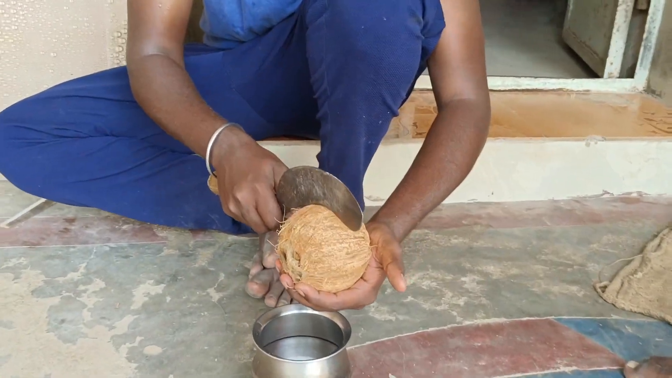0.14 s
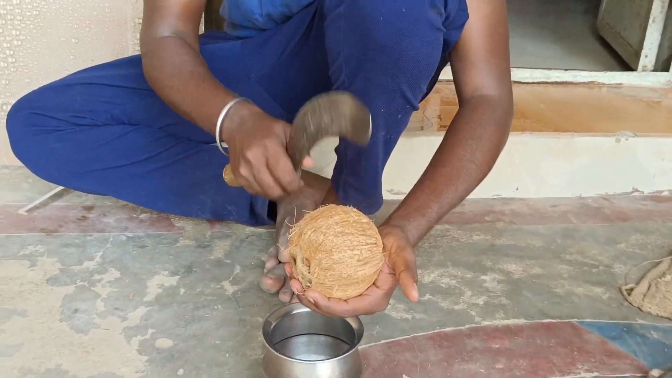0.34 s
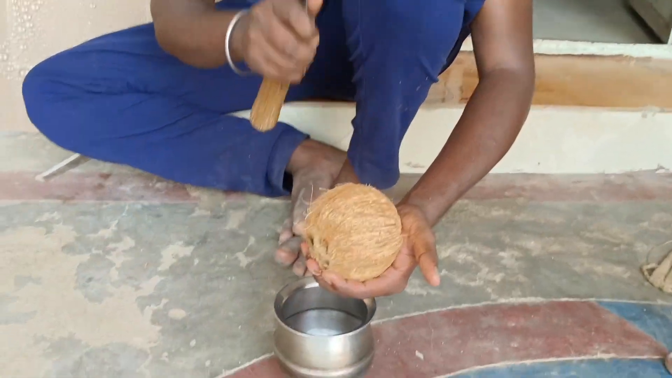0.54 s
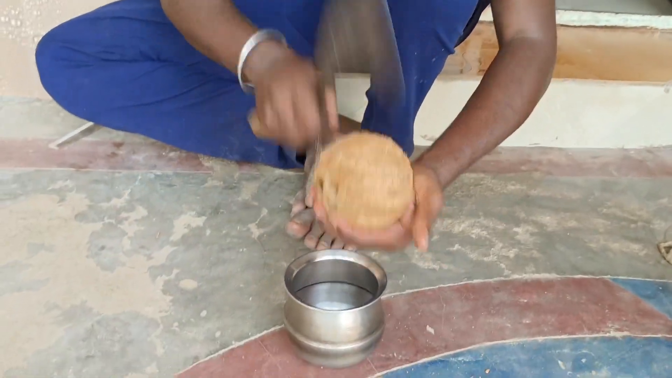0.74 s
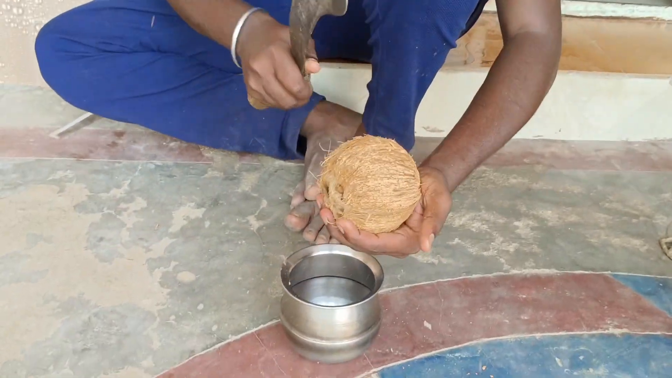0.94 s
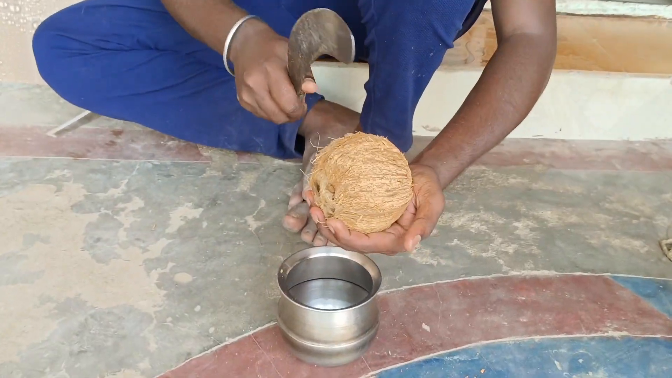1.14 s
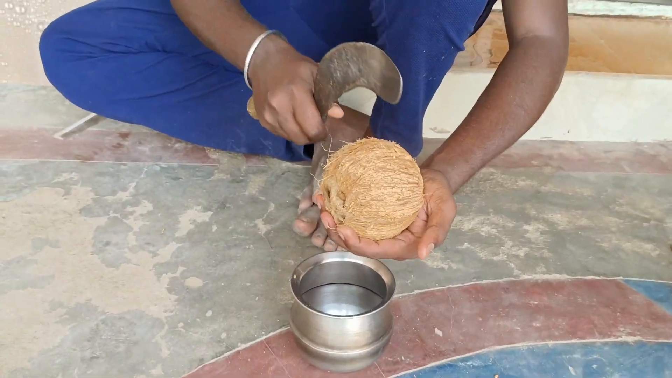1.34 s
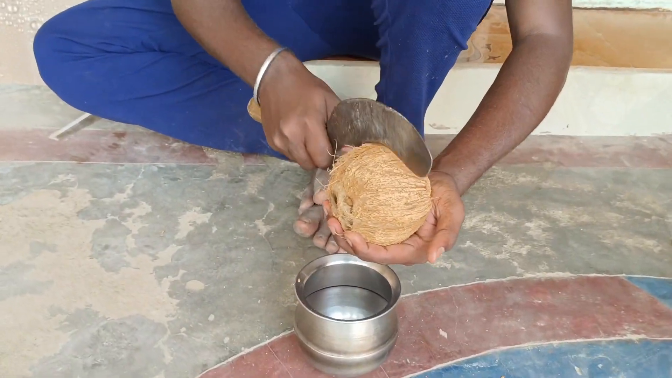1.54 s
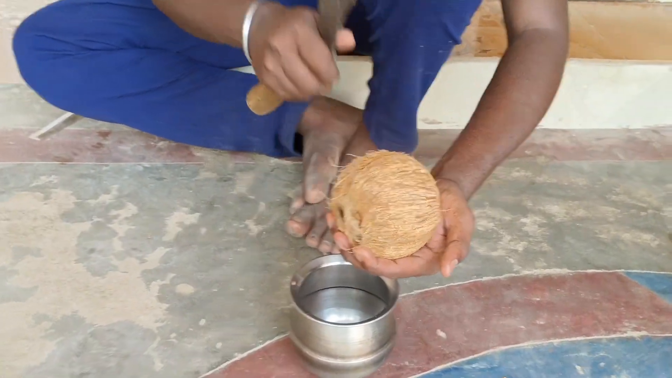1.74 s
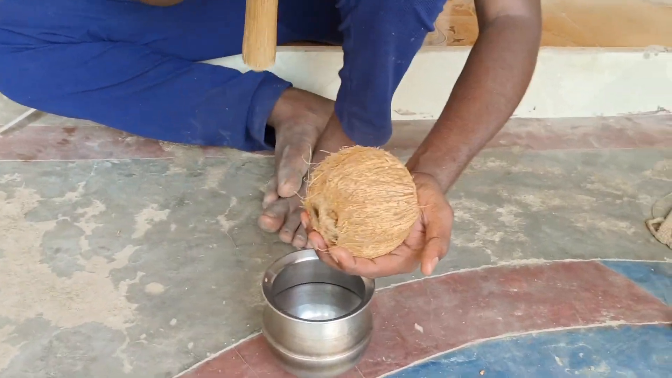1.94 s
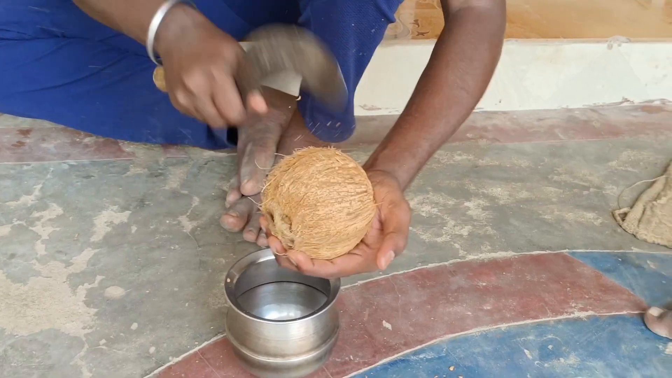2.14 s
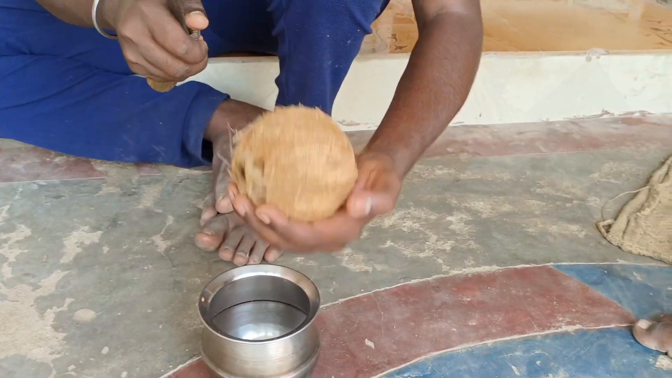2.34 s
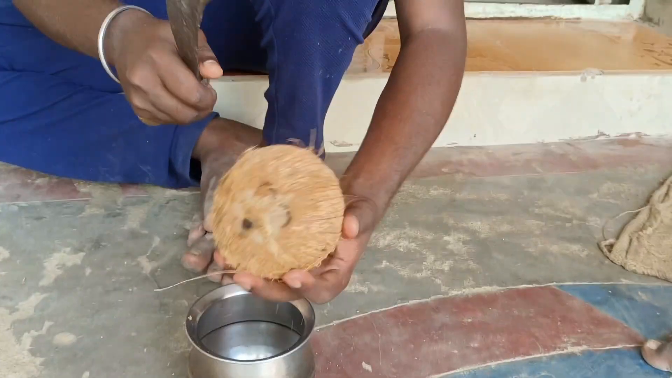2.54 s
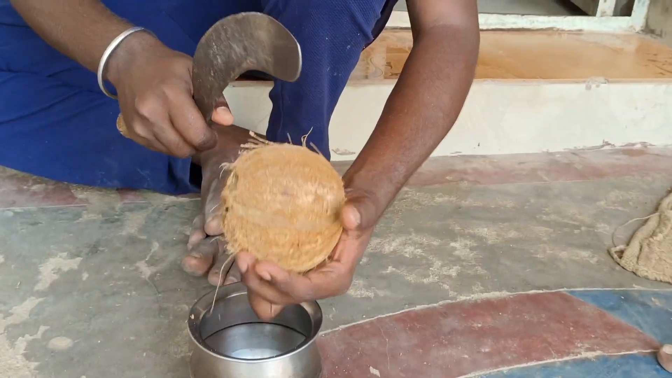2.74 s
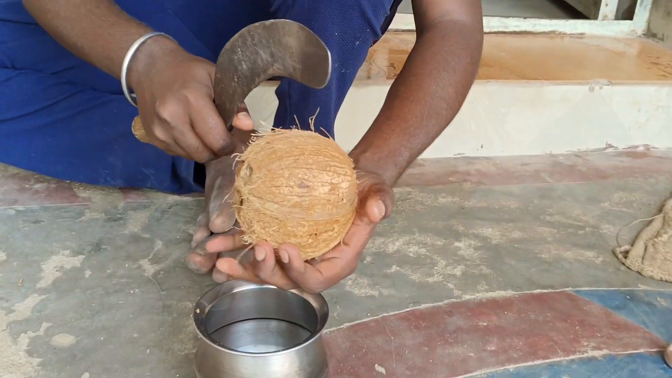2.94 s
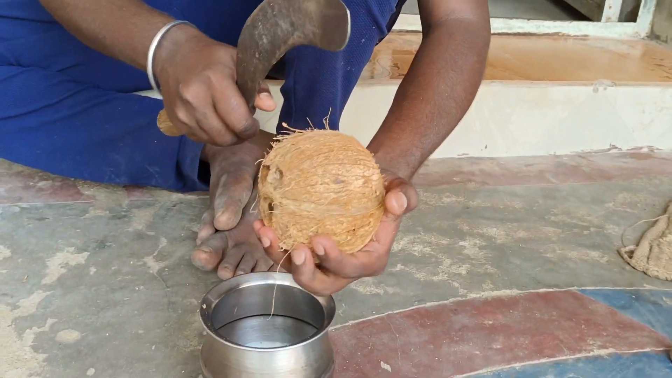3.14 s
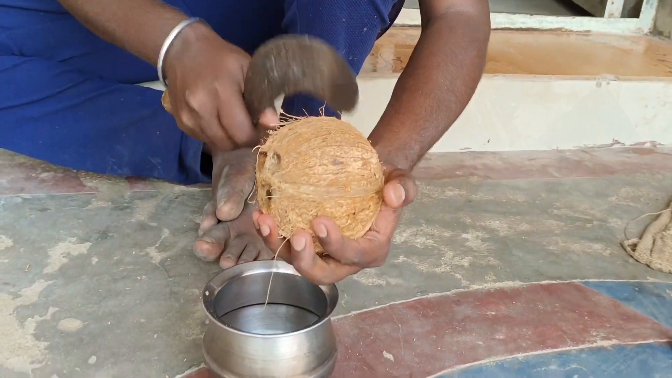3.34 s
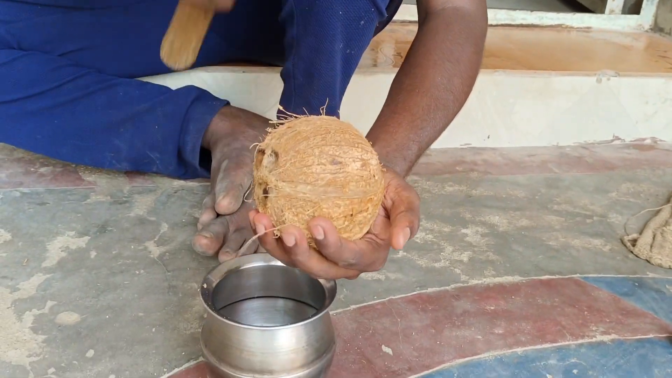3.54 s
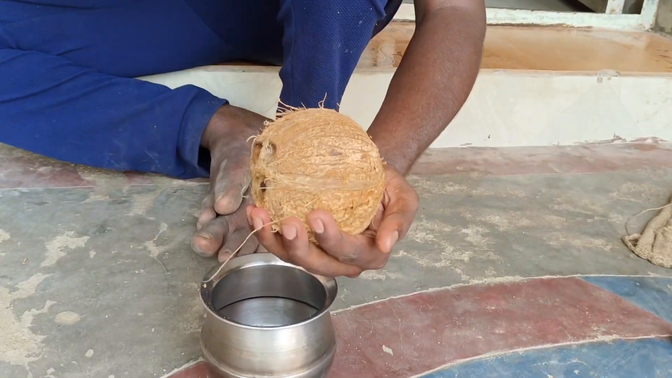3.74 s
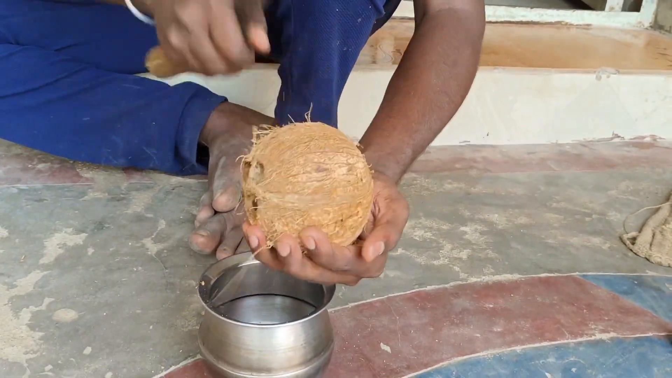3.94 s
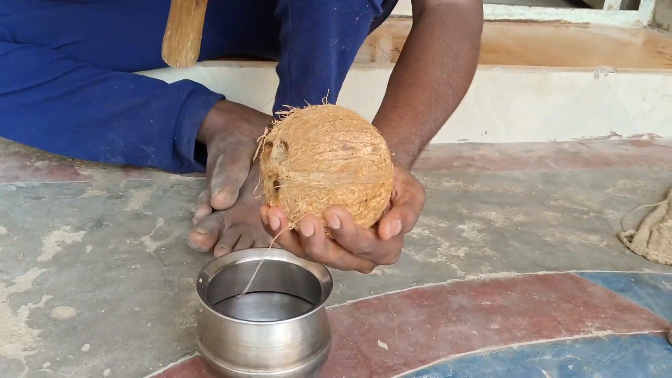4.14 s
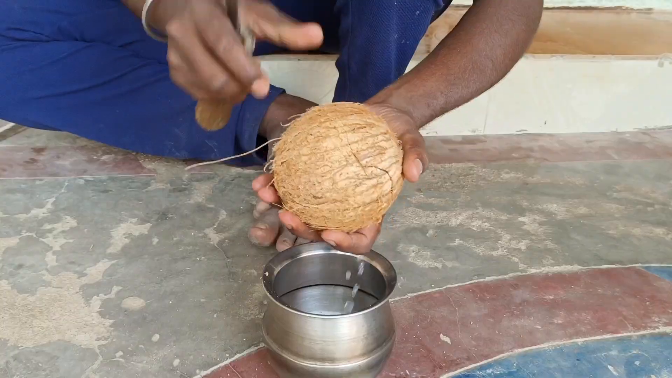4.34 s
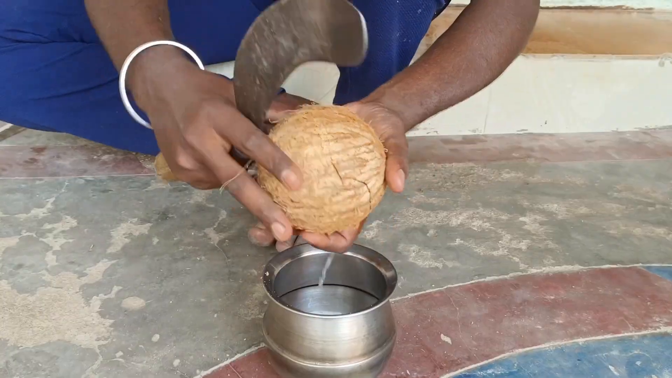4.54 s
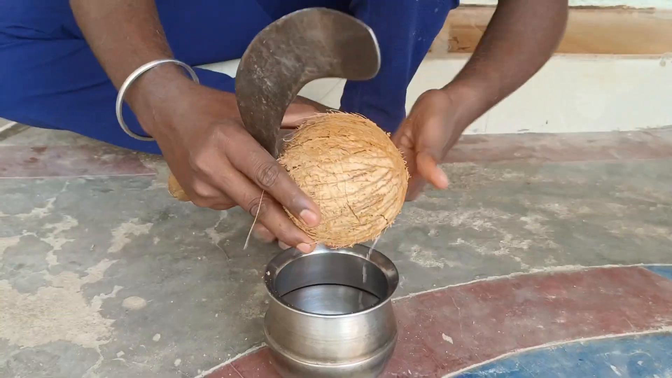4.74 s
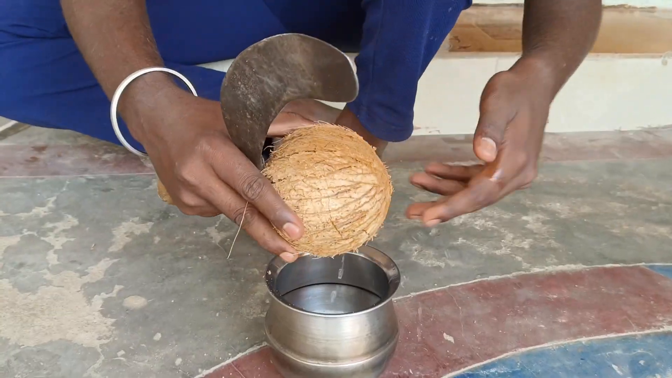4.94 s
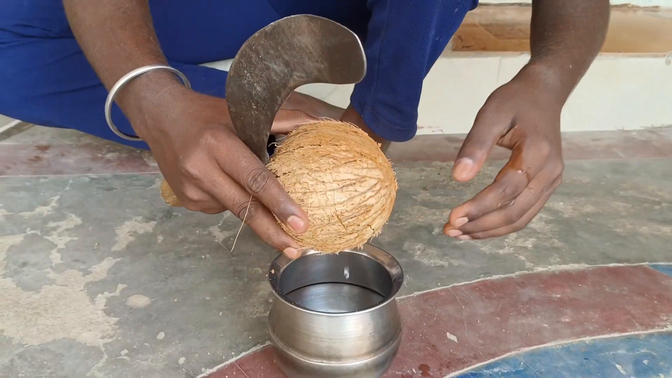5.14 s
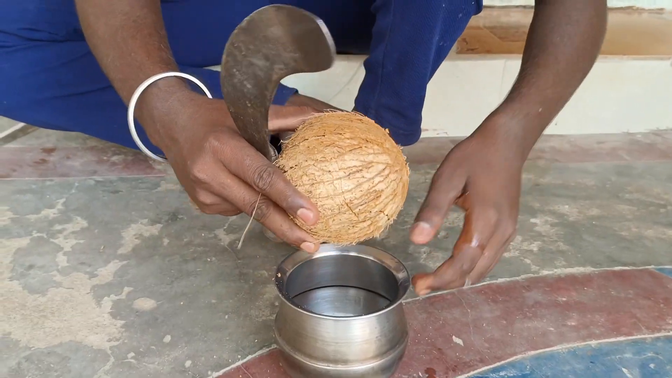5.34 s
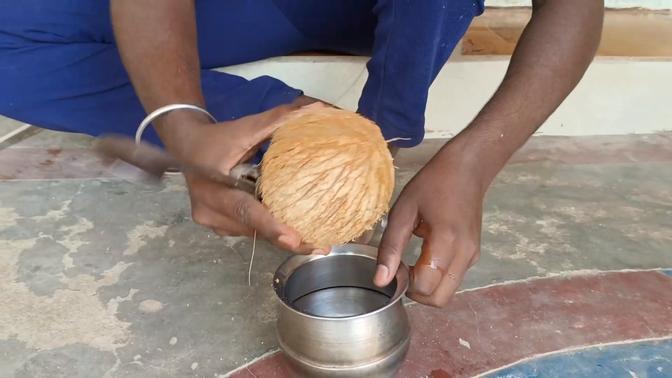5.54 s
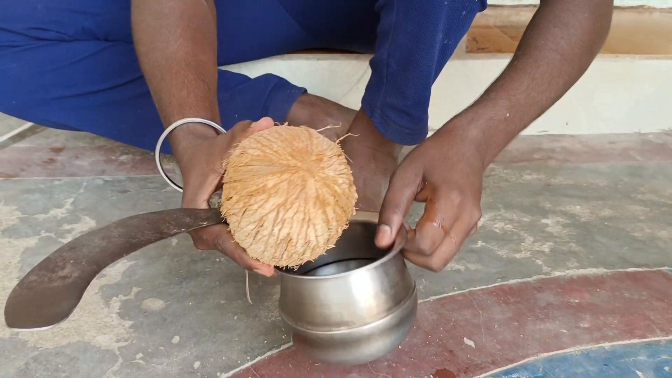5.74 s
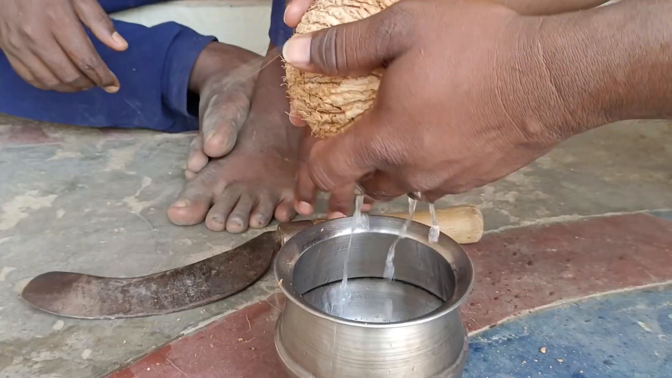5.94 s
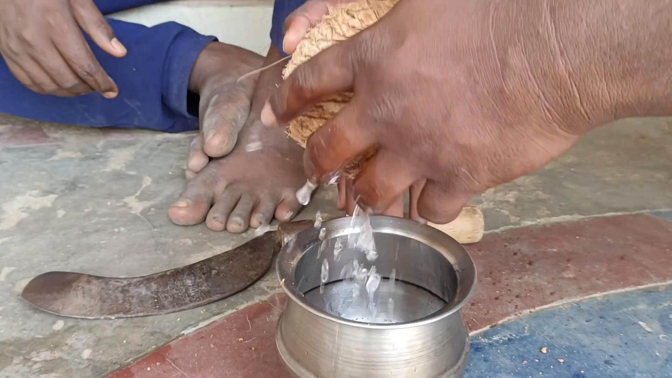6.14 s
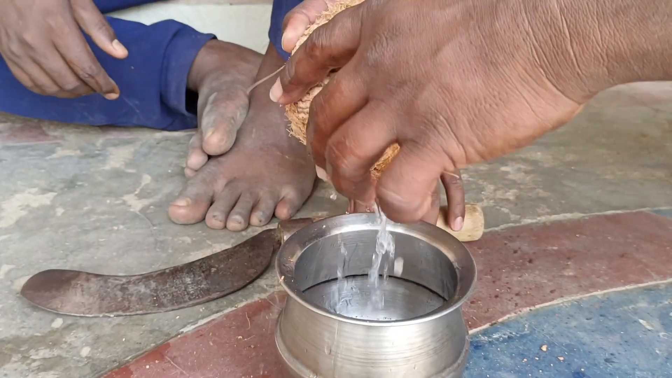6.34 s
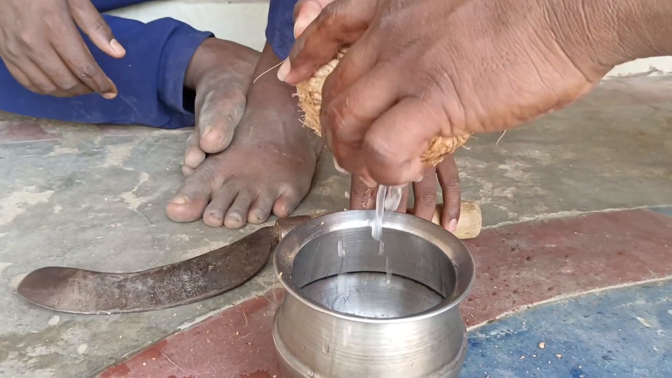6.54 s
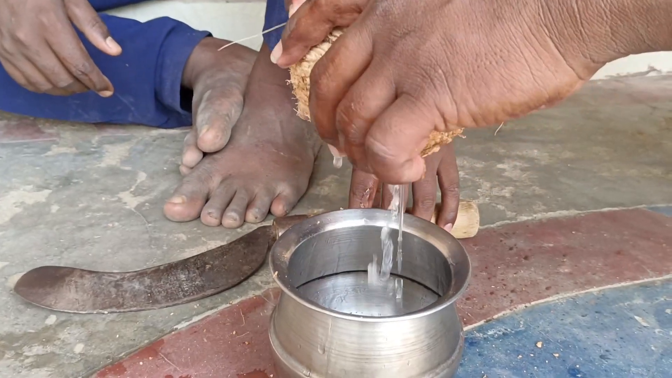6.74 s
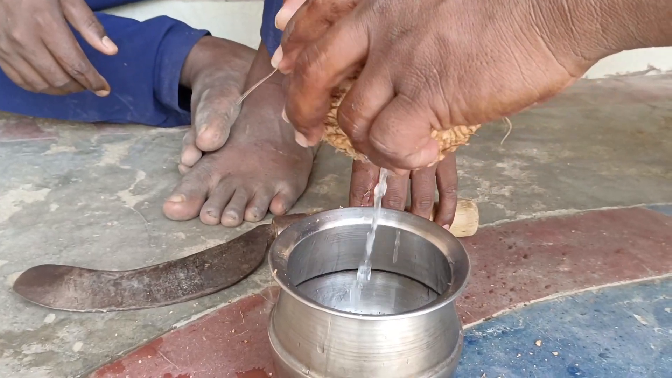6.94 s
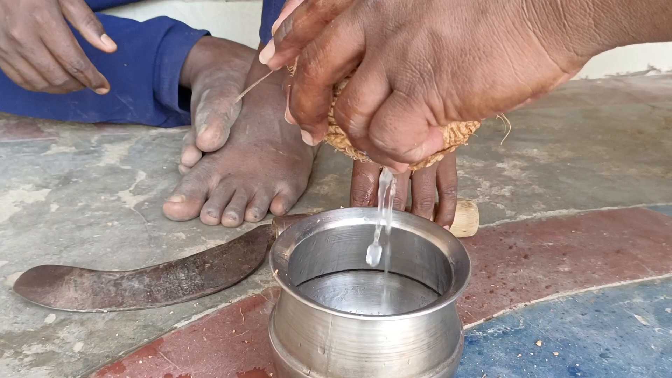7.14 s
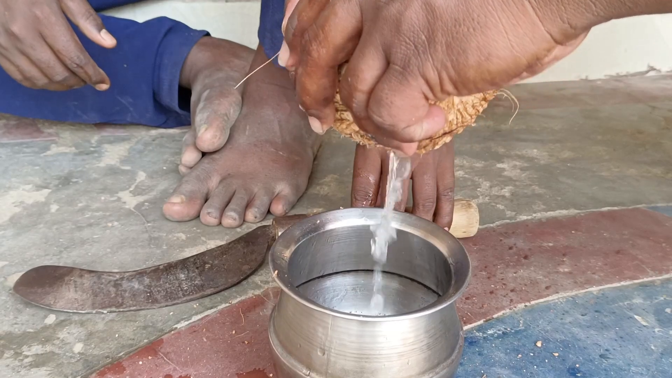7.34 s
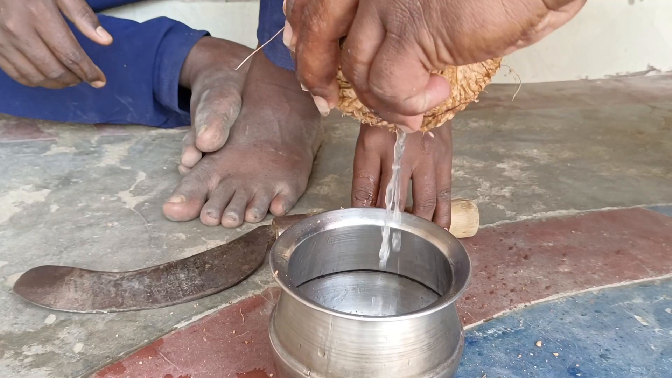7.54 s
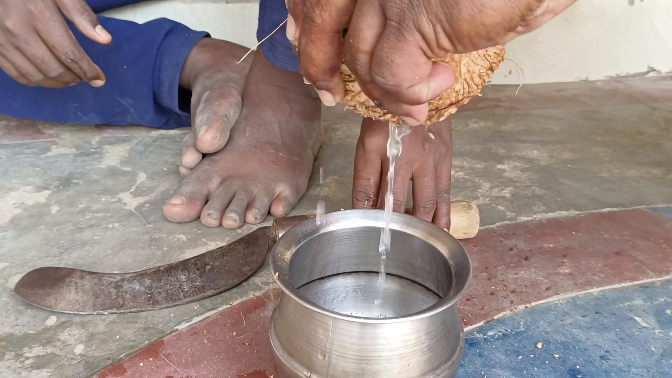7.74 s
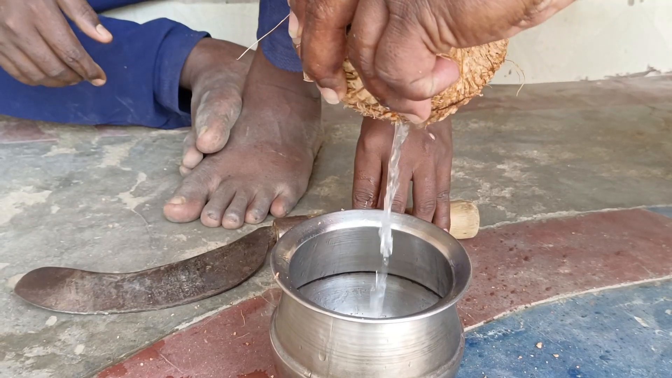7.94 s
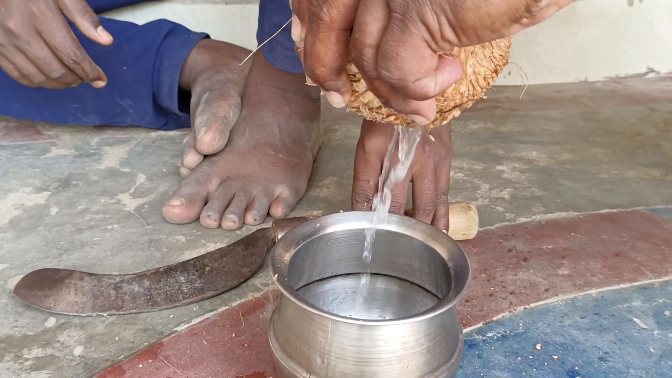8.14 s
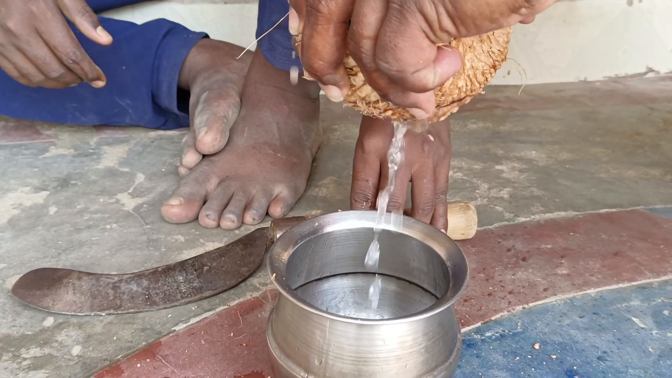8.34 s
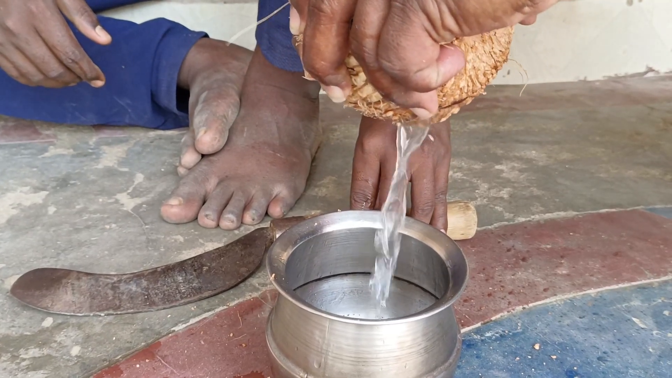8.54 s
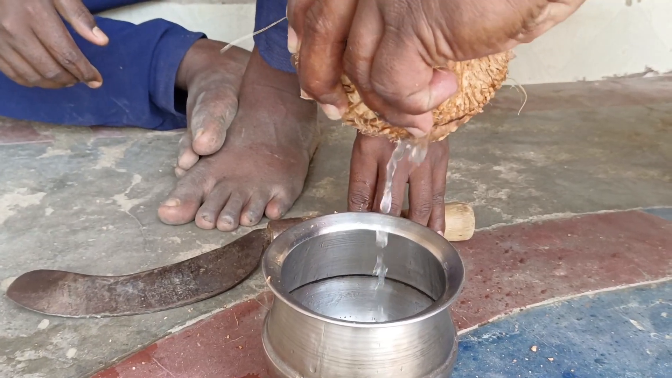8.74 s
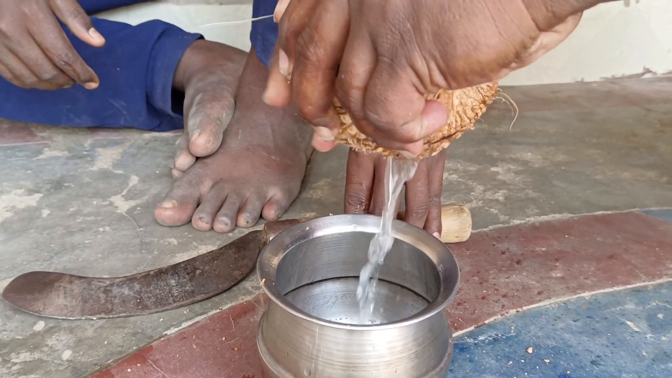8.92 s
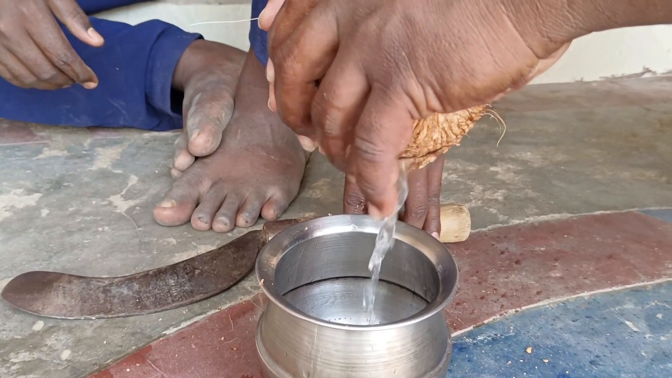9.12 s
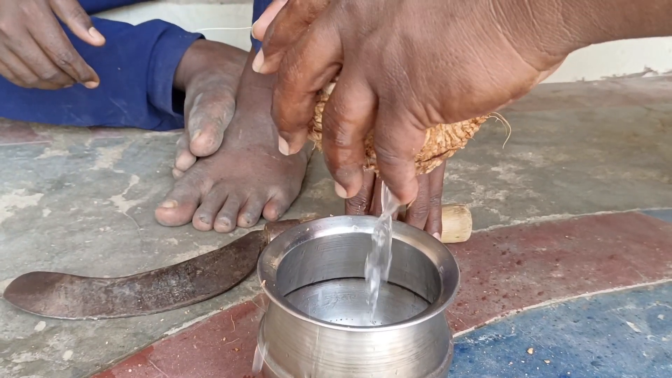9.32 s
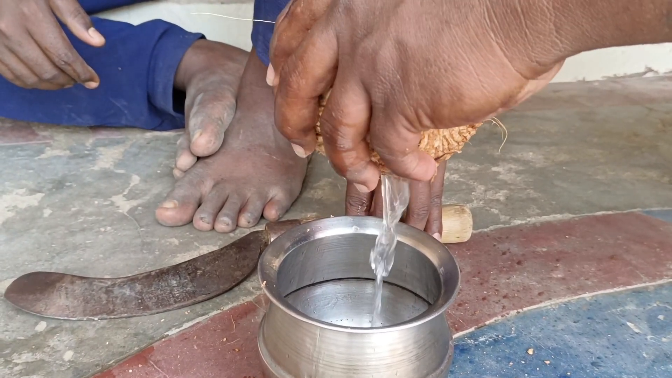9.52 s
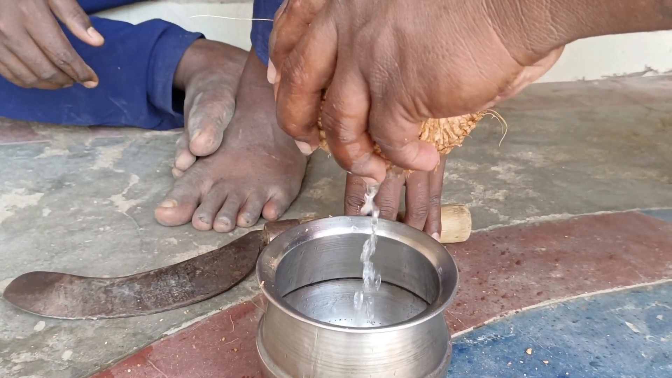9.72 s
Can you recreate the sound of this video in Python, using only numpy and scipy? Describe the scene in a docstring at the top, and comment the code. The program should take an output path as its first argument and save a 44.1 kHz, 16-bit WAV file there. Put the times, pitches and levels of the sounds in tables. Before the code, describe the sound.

A close stereo microphone on a hard-walled porch, with a faint wavering engine drone, low rumble and soft hiss behind. A small tap opens, and a harsh crow caw sounds at 0.1-0.5 s. At 0.9 s a heavy knife hits a coconut: a very loud double-biting crack, hollow shell knock, blade ring and short bright echo. Similar blows land at 2.2 s, with a low puff of air, and at 4.0 s. Lighter taps fall between, with a weaker knock at 3.4 s. A short caw comes at 4.3 s, thin bird whistles around 3.1-5.4 s, and small pot clinks at 5.5-5.9 s. From 6 s high clear drops plink into the steel pot, a dull distant caw beneath. From 6.8 s they become an uneven trickle with sharp rim ticks and fizzing spatter, fuller after 8.2 s, with deep rising bubble gulps crowding 8.9-9.9 s.

```python
"""A knife strikes a husked coconut on a hard-walled porch: fibres crack, the shell and curved blade ring.
Then its water trickles into a steel pot: drops and the stream trap bubbles that sing with rising pitch
and shake the pot, over noisy spray and sharp ticks. Fingers, bangle, knife and pot tap in between.
A crow made of throat pulses and whistling small birds call outside, over the wavering drone of a far
engine and noise in three bands: rumble, murmur and a bright hiss that swells and sinks."""
import sys
import numpy as np
from scipy import signal
from scipy.fft import rfft, irfft, next_fast_len
from scipy.io import wavfile
from scipy.ndimage import uniform_filter1d

SR = 44100
rng = np.random.default_rng(int(sys.argv[2]) if len(sys.argv) > 2 else 0)


def generate_wav(signal):
    """Clip the signal to [-1, 1] and save it as 16-bit WAV at the path in sys.argv[1]."""
    frames = np.transpose(np.atleast_2d(signal))
    scaled = np.clip(frames, -1, 1) * 32767
    pcm = np.round(scaled).astype(np.int16)
    wavfile.write(sys.argv[1], SR, pcm)


N = 435708
T = np.arange(N) / SR

# colour of the torn husk and shell: pitch_hz, relative level_db
SHELL_COLOUR = [(59, -64), (100, -33.5), (228, -23), (259, -13), (342, 0), (814, 0), (1190, -11.5),
                (1600, -13.5), (2560, -13.5), (7060, -12.5), (8920, -17.5), (9500, -14.5), (10600, -24),
                (13100, -23.5), (15800, -19.5)]
# gushes of the stream: start_s, relative fizz_db, thinning_db_per_s (negative swells), spatter_db
GUSHES = [(5.96, -50, 3, -68), (6.8, -52.5, 1.5, -56.5), (7.539, -40.5, 3, -56), (8.2, -42.5, -21, -60),
          (8.69, -34.5, 49, -46.5), (9.027, -33, 54, -46), (9.35, -41.5, -10.5, -54.5)]


def undb(db):
    """Gain of a level in dB."""
    return 10 ** (np.asarray(db) / 20)


def unit(x):
    """Scale to an rms of one."""
    return x / np.sqrt(np.mean(x ** 2))


def fade(t, t60):
    """Exponential decay that falls 60 dB in t60 seconds."""
    return np.exp(-np.log(1000) * t / max(t60, 1e-3))


def tint(x, points):
    """Colour a sound by (Hz, dB) points joined along a logarithmic pitch axis."""
    hz, db = np.transpose(points)
    size = next_fast_len(x.shape[-1])
    bins = np.arange(size // 2 + 1) * SR / size + 1
    gain = undb(np.interp(np.log(bins), np.log(hz), db))
    return irfft(rfft(x, size) * gain, size)[..., :x.shape[-1]]


def band(x, lo_hz, hi_hz):
    """Band-pass filter."""
    return signal.sosfilt(signal.butter(2, [lo_hz, hi_hz], "band", fs=SR, output="sos"), x)


def add(out, s, x, pan_db=0):
    """Mix x in at time s; positive pan leans left."""
    i = max(int(s * SR), 0)
    out[:, i:i + len(x)] += undb([[pan_db / 2], [-pan_db / 2]]) * x[:N - i]


def late(x, count):
    """Delay the left channel by a count of samples."""
    return np.array([np.roll(x[0], count), x[1]])


def walk(rate, size=N):
    """Random values held for 1 / rate seconds and slewed, with an rms of one."""
    k = int(SR / rate)
    held = np.repeat(rng.standard_normal(size // k + 1), k)
    return unit(uniform_filter1d(held, k)[:size])


def ring(modes, length_s, split=0.0081, rattle_db=3.5, pair=.6):
    """Struck modes (Hz, dB, t60 s): each is a close pair that beats and rattles, at a chance strength."""
    t = np.arange(int(length_s * SR)) / SR
    chance = rng.standard_normal((len(modes), 4))
    out = np.zeros(len(t))
    for (hz, db, t60), (strength, phase, detune, pair_phase) in zip(modes, chance):
        level = undb(db + 2.0 * strength + rattle_db * walk(90, size=len(t)))
        tone = np.sin(2 * np.pi * hz * t + 9 * phase)
        twin = np.sin(2 * np.pi * hz * (1 + split * detune) * t + 9 * pair_phase)
        out += level * fade(t, t60) * (tone + pair * twin)
    return out


def porch(send, build_s=0.013):
    """Dense reflections off hard walls, unrelated left and right, that build up and die band by band."""
    # reverberation of the porch: pitch_hz, t60_s, relative level_db
    reverb_bands = [(116, 0.87, 0), (252.1, 0.45, 4.5), (497, 0.44, 6.5), (1070, 0.4, 5), (1980, 0.39, 5),
                    (3740, 0.37, 2.5), (7500, 0.34, 0.5), (13440, 0.24, 13.5)]
    t = np.arange(int(.6 * SR)) / SR
    noise = rng.standard_normal((2, len(t)))
    echo = np.zeros((2, len(t)))
    for hz, t60, db in reverb_bands:
        echo += undb(db) * band(noise, hz / 1.089, min(hz * 1.403, 20000)) * fade(t, t60)
    echo = echo * (1 - np.exp(-t / build_s))
    return signal.fftconvolve(send, echo / np.sqrt(np.sum(echo ** 2) / 2), axes=1)[:, :N]


def engine_drone():
    """An idling engine hunts in speed; multiples of its firing rate swell as they cross porch booms."""
    # speed of the engine: time_s, firing_rate_hz (before a small random waver)
    speed = [(0.0, 41.07), (0.45, 40.8), (0.66, 40.05), (0.85, 40.3), (1.0, 44.59), (1.35, 38.78),
             (1.75, 41.25), (1.95, 44.57), (2.2, 42.03), (2.5, 36.9), (2.72, 40.71), (3.0, 39.72),
             (3.35, 41.63), (3.6, 44.5), (4.0, 44.8), (4.15, 39.08), (4.65, 40.73), (4.85, 44.88),
             (5.0, 39.14), (5.5, 41.05), (5.7, 45.45), (5.85, 38.83), (6.1, 37.86), (6.25, 40.87),
             (6.5, 45.13), (6.75, 39.33), (7.1, 38.18), (7.38, 40.9), (7.58, 42.97), (7.68, 39.54),
             (7.9, 39.86), (8.08, 37.85), (8.2, 39.8), (8.55, 41.75), (8.72, 38.8), (8.98, 41),
             (9.16, 43.23), (9.35, 40.92), (9.6, 39.27), (9.88, 40.66)]
    # multiples 2, 3, 4 of the firing rate: level_off_boom_db, boom_hz, width_hz, boom_db
    multiples = [(-63, 81.5, 4.5, 28.5), (-54, 130, 2.9, 14), (-61.5, 165, 9.2, 9)]
    fade_db_per_s, coast_db_per_hz_s, pan_db = 0.38, 0.4, -1.6
    hz = np.interp(T, *np.transpose(speed))
    # quieter while the speed drops
    slowing = np.minimum(uniform_filter1d(np.gradient(hz) * SR, size=3000), 0)
    load_db = coast_db_per_hz_s * slowing - fade_db_per_s * T
    phase = 2 * np.pi * np.cumsum(hz * (1 + 0.0091 * walk(8.3))) / SR
    out = np.zeros(N)
    for k, (off_db, boom_hz, width_hz, boom_db) in enumerate(multiples, start=2):
        db = off_db + boom_db / (1 + ((k * hz - boom_hz) / width_hz) ** 2) + load_db
        out += np.sqrt(2) * undb(db + 3.0 * walk(10)) * np.sin(k * phase)
    return out * undb([[pan_db], [-pan_db]])


def background_noise():
    """Flickering noise in three bands: rumble is the most alike left and right, hiss the least."""
    # colour of the noise: pitch_hz, relative level_db
    noise_colour = [(15, -50), (25, -19.5), (64, -4.5), (144, -8.5), (179, -11.5), (307, -24), (352, -21),
                    (542, -25), (637, -23), (812, -25.5), (1040, -28.5), (2150, -25), (3050, -35),
                    (7030, -39.5), (10500, -54.5), (13000, -51), (15800, -53.5)]
    # low and middle bands: time_s, murmur_db, rumble_db
    low_levels = [(0.0, -52, -41.5), (2.2, -62.5, -55), (2.31, -57, -51.5), (3.001, -64.5, -48.5),
                  (3.85, -63, -54.5), (4.21, -61.5, -47.5), (4.46, -61.5, -53), (4.87, -67, -55.5),
                  (5.34, -65.5, -50.5), (5.67, -62.5, -53), (8.971, -58.5, -45), (9.88, -58.5, -49)]
    # top band, a bright hiss that swells as late porch echo after hits and caws: time_s, level_db
    hiss_levels = [(0.0, -54), (0.26, -50.5), (0.69, -61), (1.11, -52.5), (1.28, -67), (1.7, -61),
                   (2.24, -73), (2.35, -58), (2.69, -71), (4.0, -68), (4.15, -56.5), (4.77, -75),
                   (6.32, -59.5), (6.75, -69)]
    s, murmur_db, rumble_db = np.transpose(low_levels)
    murmur_db, rumble_db = np.interp(T, s, murmur_db), np.interp(T, s, rumble_db)
    hiss_db = np.interp(T, *np.transpose(hiss_levels))
    # low Hz, high Hz, level dB, share unlike left and right, flicker dB
    layers = ((40, 210, rumble_db, .5, 2.5), (210, 1200, murmur_db, .7, 1.5), (1200, 19000, hiss_db, .95, .7))
    out = np.zeros((2, N))
    for lo_hz, hi_hz, db, unlike, flicker_db in layers:
        mid, side = unit(band(tint(rng.standard_normal((2, N)), noise_colour), lo_hz, hi_hz))
        out += (mid + unlike * side * np.array([[1], [-1]])) * undb(db + flicker_db * walk(25))
    return out


def birds():
    """Small birds: thin whistles, broken in pitch and level; one of them starts with an overtone."""
    # rising chirps: start_s, length_s, top_pitch_hz, level_db
    chirp_table = [(3.087, 0.084, 3720, -69.5), (3.656, 0.082, 3600, -70), (4.944, 0.18, 3650, -70),
                   (5.349, 0.14, 3663, -64)]
    # one gliding whistle: time_s, pitch_hz, level_db
    whistle = [(5.07, 2400, -82), (5.076, 2680, -69), (5.35, 2530, -74.5)]
    from_hz, rise_s, edge_db = 3260, 0.04, 15
    calls = []
    for s, length_s, hz, db in chirp_table:
        start = (s, from_hz, db - edge_db)
        peak = (s + rise_s, (from_hz + 2 * hz) / 3, db)
        end = (s + length_s, hz, db - edge_db)
        calls.append(([start, peak, end], 0))
    calls.append((whistle, .7))
    out = np.zeros((2, N))
    for call, overtone in calls:
        s, hz, db = np.transpose(call)
        t = np.arange(s[0], s[-1], 1 / SR)
        pitch = np.interp(t, s, hz) * (1 + .022 * walk(120)[:len(t)])
        phase = 2 * np.pi * np.cumsum(pitch) / SR
        level = signal.windows.tukey(len(t), .3) * undb(np.interp(t, s, db) + 5.7 * walk(61)[:len(t)])
        add(out, s[0], level * (np.sin(phase) + overtone * (t < s[0] + .08) * np.sin(2 * phase)))
    return out


def crow():
    """Jittery, strong-weak throat pulses with breath noise resonate in the throat as the beak opens."""
    # caws: start_s, rise_s, hold_s, fall_s, level_db, scale of the throat resonances
    caw_table = [(0.076, 0.097, 0.15, 0.14, -32, 0.98), (4.267, 0.0064, 0.027, 0.16, -38.5, 1.005),
                 (6.047, 0.039, 0.15, 0.19, -53, 0.705)]
    # resonances before scaling: pitch_hz, width_hz, relative level_db
    throat = [(1010, 160, -10), (1385, 230, -5.5), (1790, 350, 3.5), (2170, 220, -8), (2776, 1000, -20.5),
              (3600, 230, -15.5), (6300, 2500, -19.5)]
    pulse_hz, rise_db, fall_db = 475.5, 32, 30
    beak_opens = 0.1  # resonances start lower by this share
    out = np.zeros((2, N))
    for start, rise, hold, fall, peak_db, beak in caw_table:
        s = start + np.cumsum([0, rise, hold, fall])
        db = peak_db - np.array([rise_db, 0, 0, fall_db])
        t = np.arange(s[0], s[-1], 1 / SR)
        phase = np.cumsum(pulse_hz * (1 + 0.083 * walk(150)[:len(t)])) / SR
        cycle = phase.astype(int)
        count = cycle[-1] + 1
        size_db = 0.97 * rng.standard_normal(count) - 2.5 * (np.arange(count) % 2)
        breath = 1 + 0.25 * rng.standard_normal(len(t))
        source = undb(size_db)[cycle] * np.exp(-(phase % 1) / 0.039) * breath
        shut, wide = (sum(undb(d) * unit(band(source, b * (f - w / 2), b * (f + w / 2))) for f, w, d in throat)
                      for b in (beak * (1 - beak_opens), beak))
        opening = np.clip((t - start) / (rise + hold / 2), 0, 1)
        voice = np.cos(opening * np.pi / 2) * shut + np.sin(opening * np.pi / 2) * wide
        add(out, s[0], unit(voice) * undb(np.interp(t, s, db)), -1.0)
    return out


def bubble(hz, t60, glide, swell_s, wobble=0):
    """A trapped bubble: its pitch rises through hz as it pinches off and nears the surface."""
    t = np.arange(int(1.32 * abs(t60) * SR) + 64) / SR
    sweep = hz * (1 + glide * (.4 - np.exp(-t / (.2 * max(t60, .005)))))
    shake_db = 0
    if wobble:
        sweep = sweep * (1 + wobble * walk(149, size=len(t)))
        shake_db = 2 * walk(178, size=len(t))
    tone = np.sin(2 * np.pi * np.cumsum(sweep) / SR)
    return tone * fade(t, t60) * (1 - np.exp(-t / swell_s)) * undb(shake_db)


def single_drops():
    """Clear drops: each sings as a bubble, splats in a band around its pitch and sprays bright noise."""
    # drops: start_s, relative level_db, bubble_hz, spray_db
    drop_table = [(5.9717, -42, 4800, 4), (6.124, -26, 5210, -15), (6.24, -28, 5370, -35),
                  (6.368, -40, 5280, -26), (6.097, -39.5, 8040, 3), (6.14, -34.5, 5360, 1),
                  (6.198, -37.5, 5630, -18), (6.318, -46.5, 7100, 11.5), (6.457, -44.5, 5100, -12.5),
                  (7.663, -33, 2020, -30), (7.67, -30, 2500, -26), (7.798, -33.5, 2760, -18),
                  (9.255, -31, 2250, -24), (9.354, -39, 2100, -22), (9.413, -34, 2520, -20),
                  (6.5585, -33.5, 2250, -3.5), (6.8053, -39, 3550, -11), (6.82, -32.5, 5560, 7.5),
                  (6.9009, -39, 6000, 14), (6.955, -40, 5195, 3), (7.02, -43, 5030, 2),
                  (7.105, -44, 5470, 0), (7.335, -41, 5610, 0.5), (8.215, -36, 5400, 0),
                  (8.483, -34, 5300, 1), (8.775, -30, 5220, 1), (8.8, -33, 5350, 1), (8.89, -33.5, 5040, 1),
                  (6.994, -43, 4870, 11), (7.17, -39.5, 5430, -13), (7.193, -38.5, 2130, -18),
                  (7.255, -39.5, 2550, 10.5), (7.26, -33.5, 5130, -6), (7.537, -38.5, 5470, 5),
                  (7.5561, -27.5, 5600, -29), (7.6087, -34, 5190, 11.5), (7.668, -21.5, 5000, 0),
                  (7.7975, -25, 5270, -26), (7.823, -33, 1340, -25), (7.863, -34.5, 2490, 8.5),
                  (7.956, -28.5, 8650, -24), (7.563, -54, 1950, -20), (7.966, -45, 2000, -15),
                  (7.981, -33.5, 2050, 2.5), (8.0641, -39.5, 2100, 12.5), (8.1443, -36, 5440, -3),
                  (8.1827, -33, 6460, -0.5), (8.2298, -35, 3150, 8), (8.269, -26, 5427, 3.5),
                  (8.342, -41, 2700, -20), (8.404, -40.5, 2000, -20), (8.3536, -37.5, 2070, 9.5),
                  (8.408, -32, 6570, -2), (8.441, -28.5, 2850, 2), (8.453, -21.5, 5210, -22),
                  (8.4918, -32.5, 1920, 3), (8.5378, -24.5, 1916, -6), (8.65, -33, 5520, -1.5),
                  (8.866, -40.5, 2550, -20), (9.024, -36, 1900, -23), (9.075, -35, 3570, -33),
                  (9.125, -31, 4840, -18), (9.149, -37, 5680, -20), (8.696, -38.5, 2000, 14),
                  (8.7279, -14, 2780, -44), (8.748, -21, 5190, 3.5), (8.861, -37, 4900, 10.5),
                  (8.9515, -37, 2190, -45), (9.0304, -31.5, 1970, 10), (9.0398, -18, 2053, -40),
                  (9.095, -23.5, 3520, -41), (9.255, -26.5, 5470, -33), (9.353, -28, 5580, -3),
                  (9.397, -36, 5730, 2), (9.411, -22, 4970, -38), (9.441, -31, 4840, -40),
                  (9.5104, -31.5, 2270, -17), (9.533, -32, 5500, -24), (9.559, -28.5, 5650, -18),
                  (9.6372, -31.5, 3730, -1), (9.716, -38, 2200, 5), (9.793, -39.5, 3720, -20),
                  (9.484, -40, 3650, -20), (9.53, -37, 2530, -20), (9.573, -44, 2600, -20),
                  (9.824, -52, 2290, -20), (9.849, -38.5, 2700, -19)]
    t60, pan_db_per_octave = 0.015, 4
    out = np.zeros((2, N))
    t = np.arange(int(.07 * SR)) / SR
    for s, db, hz, spray_db in drop_table:
        pan_db = pan_db_per_octave * np.log2(hz / 5000)  # deeper drops sit further right
        noise = rng.standard_normal(len(t))
        splat = unit(band(band(noise, .85 * hz, 1.2 * hz), .85 * hz, 1.2 * hz)) * fade(t, 3 * t60)
        spray = undb(spray_db) * unit(band(noise, 3980, 9400)) * fade(t, 0.031)
        song = bubble(hz, t60, min(500 / hz, .35), swell_s=.0007)
        add(out, s, undb(db) * 2.6 * song, pan_db)
        add(out, s, undb(db) * (0.55 * splat + .5 * spray) * (1 - np.exp(-t / 0.00014)), pan_db)
    return out


def gulps():
    """Large bubbles under the stream, shaking in level and pitch."""
    # gulps: time_s, relative level_db, bubble_hz, t60_s, rise of pitch as a share
    gulp_table = [(6.556, -31, 1930, .05, 0.46), (7.189, -42, 1332, 0.051, 0.24),
                  (7.628, -52, 733, 0.044, .3), (7.822, -39, 657, 0.045, 0.31),
                  (7.824, -39, 1096, 0.057, 0.5), (7.901, -44.5, 1044, 0.076, .1),
                  (8.23, -46, 1500, 0.035, 0.27), (8.28, -43, 1150, 0.035, 0.28),
                  (8.32, -44, 1650, 0.031, .3), (8.65, -47, 1670, 0.032, .3),
                  (8.403, -36.5, 896, 0.058, 0.25), (8.493, -36.5, 1285, 0.056, 0.24),
                  (8.536, -40, 1230, 0.047, 0.29), (8.591, -40.5, 598, 0.067, 0.082),
                  (8.888, -31, 530, 0.046, 0.081), (8.899, -18.5, 661.8, 0.047, 0.28),
                  (8.93, -34.5, 634, 0.07, 0.11), (8.96, -46, 1050, 0.044, 0.11),
                  (8.993, -42, 855, 0.042, 0.44), (9.038, -46, 690, 0.048, 0.056),
                  (9.095, -46.5, 1090, 0.049, 0.17), (9.151, -45, 1159, 0.087, 0.29),
                  (9.198, -21.5, 657, 0.048, 0.093), (9.222, -32, 650, 0.053, 0.082),
                  (9.252, -38.5, 783, 0.076, .15), (9.366, -30.5, 745, 0.038, .1),
                  (9.415, -42, 1046, 0.049, .1), (9.437, -22, 735, 0.029, 0.075),
                  (9.441, -40, 1590, 0.04, 0.23), (9.462, -39, 790, 0.035, 0.087),
                  (9.51, -41, 1090, 0.059, 0.1), (9.571, -24, 741.9, 0.03, 0.082),
                  (9.623, -35, 750, 0.033, .1), (9.66, -44, 1177, 0.08, 0.085),
                  (9.692, -21.5, 744, 0.029, 0.065), (9.717, -25.5, 735, 0.05, 0.13),
                  (9.784, -27, 693, 0.06, 0.21), (9.827, -27.5, 734, .06, 0.14)]
    out = np.zeros((2, N))
    for s, db, hz, t60, glide in gulp_table:
        gulp = bubble(hz, t60, glide, swell_s=0.0039, wobble=0.033)
        add(out, s - .002, 2.87 * undb(db) * gulp)
    return out


def pot_ring(bubbles):
    """The wet steel pot rings in sympathy with the bubbles."""
    # modes of the wet pot: pitch_hz, relative level_db, t60_s
    wet_modes = [(682, -16, 0.062), (1985, -6, 0.097), (2664, -10.5, .05), (3490, -11.5, 0.065),
                 (4790, -13, 0.035), (5300, -13, 0.036), (5640, -12, .03), (6700, -18, .04)]
    pot = np.array([ring(wet_modes, .2, split=0.0022, rattle_db=1.5, pair=0.44) for _ in range(2)])
    return undb(-29.5) * signal.fftconvolve(bubbles, pot, axes=1)[:, :N]


def flow(levels_db):
    """Level of the stream in dB: each gush starts at its own level and thins or swells until the next."""
    # the hands shift and the stream nearly stops: from_s, to_s (a span acts only if to_s is later)
    pauses = [(6.701, 6.7), (7.449, 6.6), (8.582, 8.68)]
    db = np.full(N, -120.)
    for (s, _, thin, _), gush_db in zip(GUSHES, levels_db):
        db = np.where(T >= s, gush_db - thin * (T - s), db)
    for a, b in pauses:
        db = db - 26 * ((T > a) & (T < b))
    return uniform_filter1d(db, size=600)


def droplets(rate, spread_db, tail_s):
    """Lone clicks of widely spread size that come in clusters, each smeared by a short noisy tail."""
    crowd = rate / SR * undb(9.0 * walk(30))
    sizes = (rng.random(N) < crowd) * undb(spread_db * np.minimum(rng.exponential(size=N), 2.5))
    smear = signal.lfilter([1], [1, -np.exp(-1 / (tail_s * SR))], sizes)
    return smear * rng.standard_normal((2, N))


def small_bubbles(level_db):
    """Little bubbles of all sizes chirp upward wherever the stream lands."""
    per_s, offset_db, spread_db, cycles = 260, -1, 4, 13.6
    out = np.zeros((2, N))
    start = GUSHES[0][0]
    span = T[-1] - start
    for when, size, loud, glide, side in rng.random((int(per_s * span), 5)):
        s, hz = start + when * span, 1600 * 4.5 ** size
        db = level_db[int(s * SR)] + offset_db + spread_db * min(-np.log(loud + 1e-9), 2.5)
        chirp = bubble(hz, cycles / hz, 0.5 * glide, swell_s=0.00069)
        add(out, s, undb(db) * chirp, 10.0 * (side - .5))
    return out


def stream():
    """The stream spatters brightly, fizzes with small splashes and traps little bubbles."""
    _, fizz_db, _, spatter_db = np.transpose(GUSHES)
    fizz_db, spatter_db = flow(fizz_db), flow(spatter_db)
    spatter_colour = [(4000, -21.5), (7000, -1.5), (9500, -5.0), (12500, -5.0), (16000, -5.5)]  # Hz, dB
    spatter = tint(droplets(250.0, 3.8, 0.0015), spatter_colour)
    # small splashes, crisp across four bands, over slower ones that keep to one band: low Hz, high Hz, dB
    sizes = ((975, 1800, -18.5), (1970, 3100, -6.0), (3400, 4100, -7.0), (4770, 7460, -3.0))
    crisp = unit(droplets(110.0, 3.7, 0.001))
    fizz = np.zeros((2, N))
    for lo_hz, hi_hz, db in sizes:
        splashes = crisp + .7 * unit(droplets(150., 2.3, .003))
        fizz += undb(db) * unit(band(band(splashes, lo_hz, hi_hz), lo_hz, hi_hz))
    out = unit(spatter) * undb(spatter_db) + unit(fizz) * undb(fizz_db - 6.5)
    return out + small_bubbles(fizz_db)


def rim_ticks():
    """Fine droplets hit the steel rim: a sharp bright tick, then a brief mist."""
    # ticks: start_s, relative level_db
    tick_table = [(5.992, -36), (6.0966, -41.5), (6.287, -32.5), (6.514, -41), (6.6805, -44),
                  (6.7967, -32.5), (6.819, -39), (6.8485, -38), (6.9025, -23), (7.0016, -34), (7.1093, -44),
                  (7.1298, -33), (7.1525, -41), (7.2312, -45.5), (7.2592, -43), (7.2947, -50),
                  (7.3554, -30.5), (7.3815, -34), (7.538, -40), (7.6693, -38), (7.705, -35), (7.797, -47),
                  (7.8619, -47), (7.957, -40.5), (7.9786, -47), (8.0479, -39), (8.1026, -27), (8.1956, -33),
                  (8.256, -28), (8.2749, -28), (8.3547, -27.5), (8.4042, -31), (8.439, -30), (8.65, -44.5),
                  (8.6845, -31), (8.7263, -28), (8.7489, -31), (8.8655, -30), (9.03, -31), (9.3349, -39),
                  (9.4128, -39), (9.4363, -44), (9.5116, -39.5), (9.7162, -35), (9.8244, -48.5),
                  (9.8518, -46)]
    # colour of a tick: pitch_hz, relative level_db
    tick_colour = [(3000, -26), (6000, 3), (9000, -5), (10500, 3), (12500, 0), (16000, 1.5)]
    out = np.zeros((2, N))
    t = T[:int(.08 * SR)]
    decay = fade(t, 0.018) + undb(-7.5) * fade(t, 0.068)
    for s, db in tick_table:
        noise = unit(tint(rng.standard_normal(len(t)), tick_colour))
        add(out, s, undb(db - 4.5) * noise * decay)
    return out


def water():
    """Drops and gulps shake the pot; the stream spatters in between and droplets tick on the rim."""
    bubbles = single_drops() + gulps()
    return bubbles + pot_ring(bubbles) + stream() + rim_ticks()


def puffs():
    """The hardest blows push a one-cycle gust, stronger at right, and a low thump through the floor."""
    # gusts at the microphones: time_s, relative level_db, length_s
    puff_table = [(0.908, -23.5, 0.03), (2.201, -17, 0.032), (3.991, -27, 0.021)]
    thump_hz, thump_db, thump_t60_s = 95, 1, 0.13
    out = np.zeros((2, N))
    t = T[:SR // 5]
    for s, db, length_s in puff_table:
        u = np.arange(0, 1, 1 / (length_s * SR))
        add(out, s, undb(db) * np.sin(2 * np.pi * u) * np.sin(np.pi * u), -22.0)
        thump = np.sin(2 * np.pi * thump_hz * t) * fade(t, thump_t60_s)
        add(out, s - .008, undb(db + thump_db) * thump, -8.0)
    return out


def knock(thud_db, edge_db, body_hz, body_db, body_t60, crack_t60):
    """Fibres crack in a short uneven burst and what was touched rattles on in its own band."""
    t = np.arange(int(.5 * SR)) / SR
    noise = tint(rng.standard_normal(len(t)), SHELL_COLOUR)
    parts = ((100, 1000, thud_db), (1000, 6000, 0), (5500, 14000, edge_db))
    crack = sum(undb(d) * unit(band(noise, lo, hi)) for lo, hi, d in parts) * fade(t, crack_t60)
    body = undb(body_db) * unit(band(noise, 0.86 * body_hz, 1.22 * body_hz)) * fade(t, body_t60)
    crunch = undb(3 * walk(400, size=len(t)))
    return .6 * (crack + body) * crunch * (1 - np.exp(-t / .0004))


def taps():
    """Fingers, bangle, knife and pot touch things and ring the empty pot; gives direct sound and porch send."""
    # taps: start_s, relative level_db, thud_db, edge_db, body_hz, pot_ring_db, porch_db
    tap_table = [(0.0094, -33, -12, -5, 2330, -25.5, -5.5), (0.51, -31, -1, -18, 2060, -40, -12),
                 (0.51, -34, -8.5, -2.5, 4940, -40, -18), (1.189, -44, -9, -6, 2630, -30, -18),
                 (1.672, -45, -27.5, -9.5, 2430, -40, -1.5), (1.724, -41.5, -28.5, -28, 2311, -28, -15),
                 (2.7538, -48, 6, -25, 2350, -32.5, -4.5), (3.545, -36.5, -10, -12, 2050, -39, -29),
                 (3.579, -57, -20, -6, 4034, -40, -24), (4.288, -33.5, -17, -23, 1896, -34, 0.5),
                 (4.4835, -52.5, -18, -9, 5700, -9, -9), (5.547, -49.5, -12.5, -18, 617, -9.5, -11.5),
                 (5.6084, -45.5, -1, -2.5, 6300, -23.5, -3.5), (5.642, -49, -5, -11, 6360, -22, -7),
                 (5.68, -52.5, -7, 9, 618, -3.5, -0.5), (5.7115, -35, -6, -26, 643, -7.5, -19),
                 (5.8649, -38.5, -28, -25, 2100, -26.5, -4)]
    # modes of the empty pot: pitch_hz, relative level_db, t60_s
    empty_modes = [(640, -4, .2), (1647, -6, .35), (2455, -14, .15), (2853, -7, .15), (3682, -10, .16),
                   (4100, -12, .1), (4840, -6, .1), (5464, -3, .12), (6035, -10, .1), (6551, -11, .1),
                   (7000, -12, .08), (7499, -6, .1)]
    dry, send = np.zeros((2, N)), np.zeros((2, N))
    for s, db, thud_db, edge_db, hz, pot_db, porch_db in tap_table:
        touch = knock(thud_db, edge_db, hz, body_db=0.5, body_t60=0.028, crack_t60=3 * 0.0063)
        touch = touch + undb(pot_db) * ring(empty_modes, .5)
        add(dry, s, undb(db) * touch, pan_db=9.5)
        add(send, s, undb(db + porch_db) * 3.8 * touch)
    return dry, send


def nut(thud_db, body_hz, body_db):
    """The hollow booms with the thud; the shell rings most around the pitch of the spot that was hit."""
    # modes of the coconut: pitch_hz, relative level_db, t60_s
    nut_modes = [(240, -18, .1), (345, -8, .1), (452, -4, .13), (620, -9, .06), (800, -8, .07),
                 (1206, -6, .1), (1630, -8, .1), (1880, -3, .12), (2140, -8, .12), (2300, -4, .16),
                 (2700, -4, .29), (3080, -6, .12), (3330, -3, .24), (3560, -7, .2), (3800, -6, .24),
                 (4050, -4, .3), (4250, -5, .3), (4870, -10, .12)]
    hollow_db, shell_db, db_per_octave = -16, -6, 15
    modes = []
    for hz, db, t60 in nut_modes:
        if hz < 1000:
            struck_db = thud_db + hollow_db
        else:
            struck_db = body_db + shell_db - db_per_octave * abs(np.log2(hz / body_hz))
        modes.append((hz, db + struck_db, t60))
    return ring(modes, .5, split=.016, rattle_db=4.)


def bang(thud_db, edge_db, body_hz, body_db):
    """What a blow throws at the walls: one click with the colour of the shell."""
    click = np.zeros(4096)
    click[200] = 1
    click = tint(click, SHELL_COLOUR)
    parts = ((100, 1000, thud_db), (1000, 6000, 0), (5500, 14000, edge_db),
             (.8 * body_hz, 1.25 * body_hz, body_db + 7))
    return sum(undb(d) * unit(band(click, lo, hi)) for lo, hi, d in parts)


def blows():
    """Knife or hand hits the nut; crack, shell and blade ring; gives direct sound and porch send."""
    # blows, each hard one biting twice: start_s, relative level_db, thud_db, edge_db, body_hz, body_db,
    # blade_belly_db, blade_tip_db, porch_db
    blow_table = [(0.898, 5.5, -5.5, -12.5, 2680, -21, -15.5, -34, 1.5),
                  (0.923, 0.5, -17, -15, 2804, -14, -16.5, -21, -3),
                  (2.1953, 5.5, -11.5, -28, 2090, -17, -51.5, -35, -3.5),
                  (2.2118, 1.5, -3, -8, 2750, -12, -47.5, -18, -5.5),
                  (1.665, -36.5, 7, -22, 2350, -9, -60, -60, -8.5),
                  (3.4058, -20, 0.5, -6, 3330, -6.5, -50, -55.5, -9.5),
                  (3.4225, -27, -4, -12, 3250, -4, -55, -55, -16),
                  (4.628, -32.5, 5.5, -28, 2040, -8.5, -59.5, -60, -13.5),
                  (3.9825, 4.5, -5, -14, 3060, -12, -41, -56, -2.5),
                  (4.001, 3, -17.5, -32, 2700, -17, -30.5, -43, -15)]
    # modes of the curved blade: pitch_hz, relative level_db, t60_s
    blade_modes = [(2460, -9, .3), (2536, -4, .5), (2902, -12, .17), (3747, -18, .15), (4678, -14, .2),
                   (9465, -16, .22), (9750, -9, .3), (11255, -15, .28), (12610, -9, .2)]
    belly_modes = [m for m in blade_modes if m[0] < 8000]
    tip_modes = [m for m in blade_modes if m[0] > 8000]
    dry, send = np.zeros((2, N)), np.zeros((2, N))
    for s, db, thud_db, edge_db, hz, body_db, belly_db, tip_db, porch_db in blow_table:
        shell = nut(thud_db, hz, body_db)
        crack = knock(thud_db, edge_db, hz, body_db - 6.5, body_t60=0.13, crack_t60=3 * 0.0055)
        belly = undb(belly_db) * ring(belly_modes, .5, split=.004, rattle_db=2.6)
        blade = belly + undb(tip_db) * ring(tip_modes, .5)
        add(dry, s, undb(db) * (crack + shell + blade), pan_db=5.5)
        add(send, s, undb(db + porch_db - 5) * shell)
        add(send, s, undb(db + porch_db) * .4 * blade)
        add(send, s, undb(db + porch_db - 12.5) * bang(thud_db, edge_db, hz, body_db))
    return dry, send


def scene():
    """Everything near sounds in the porch; the crow reaches it mostly by reflection."""
    blow, blow_send = blows()
    tap, tap_send = taps()
    wet, caw, song = water(), crow(), birds()
    send = blow_send + tap_send + undb(-10.0) * wet + undb(7.0) * caw + undb(6.5) * song
    near = late(blow + tap, count=4) + late(wet, count=2)  # the left side hears late
    return near + puffs() + caw + song + porch(send) + engine_drone() + background_noise()


def record(dry):
    """Each microphone has its colour; the loudest peaks are flattened and the top is cut."""
    # colour of the left and right microphones, one list each: pitch_hz, level_db
    microphones = [
        [(60, -1.5), (1000, -6), (4400, 1), (9800, 0), (12500, 8), (15000, -3)],
        [(60, -4.5), (1000, -2.5), (4400, -5), (9800, 3.5), (12500, -3.5), (15000, -3)],
    ]
    heard = 1.033 * np.array([tint(x, colour) for x, colour in zip(dry, microphones)])
    flattened = heard / (1 + heard ** 4) ** .25
    top_cut = signal.ellip(8, .2, 70, 15800, fs=SR, output="sos")  # low-pass at 15.8 kHz
    return signal.sosfilt(top_cut, flattened)


dry = scene()
out = record(dry)
generate_wav(out)
```